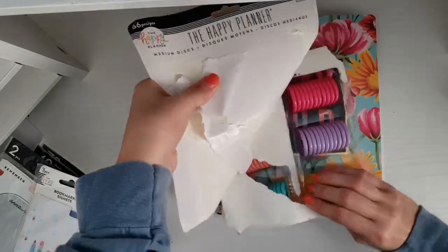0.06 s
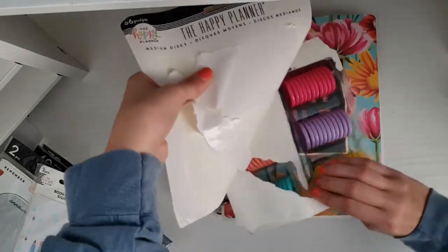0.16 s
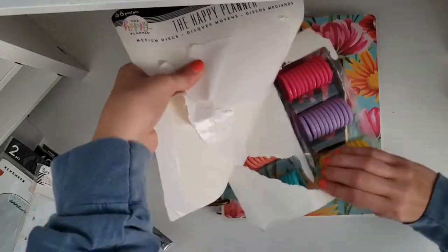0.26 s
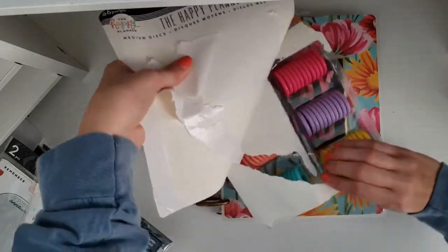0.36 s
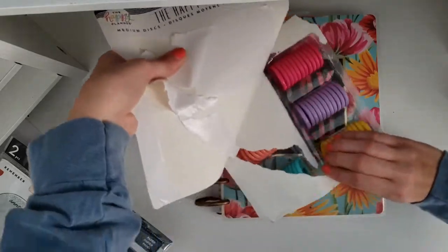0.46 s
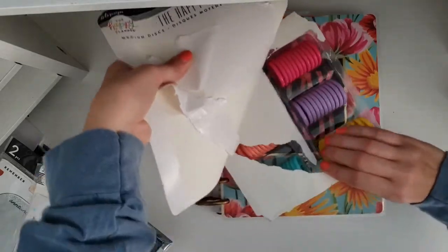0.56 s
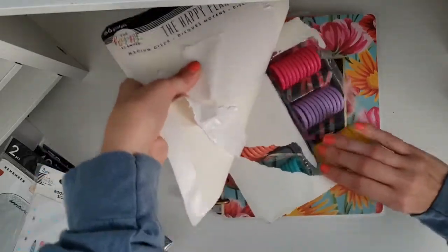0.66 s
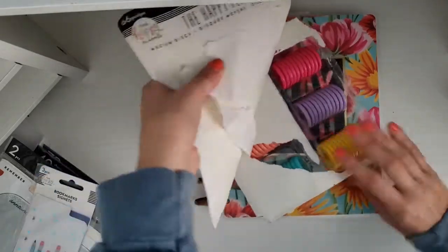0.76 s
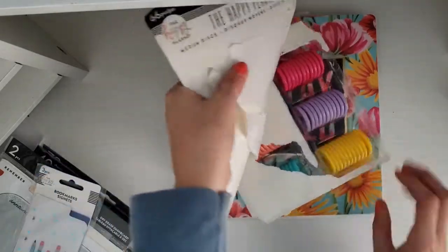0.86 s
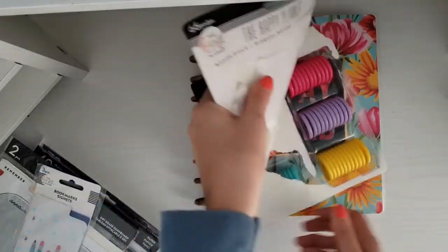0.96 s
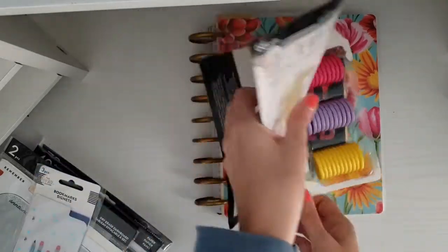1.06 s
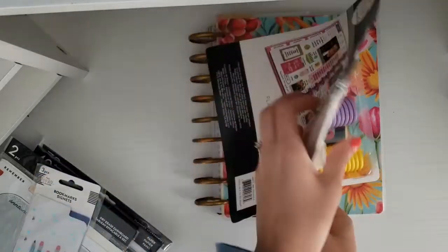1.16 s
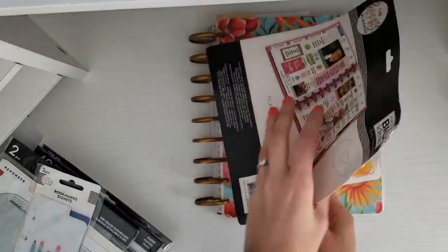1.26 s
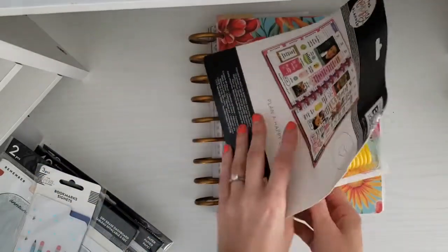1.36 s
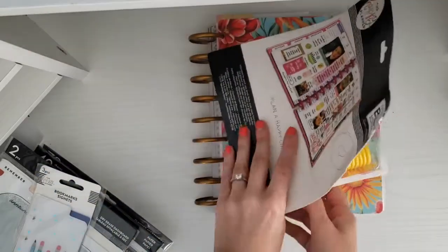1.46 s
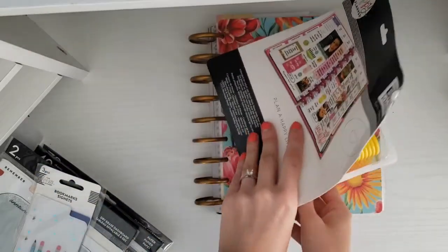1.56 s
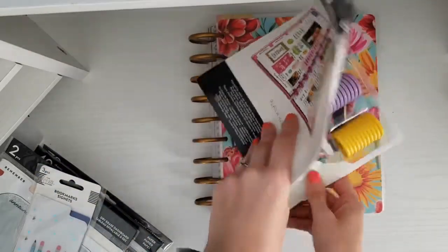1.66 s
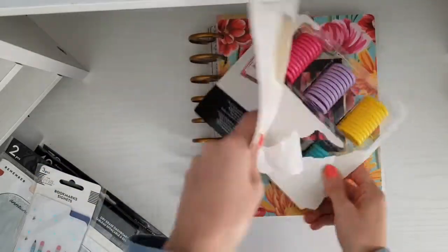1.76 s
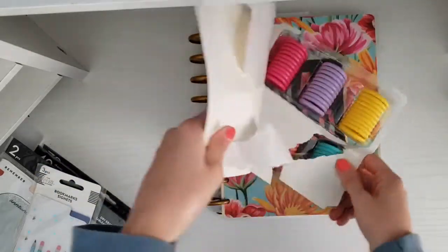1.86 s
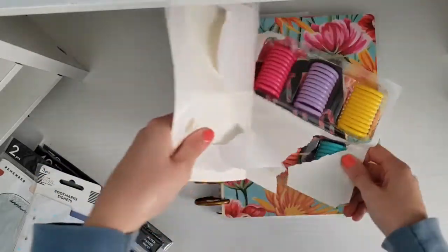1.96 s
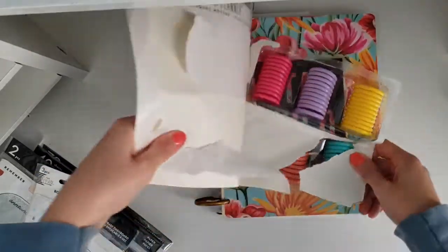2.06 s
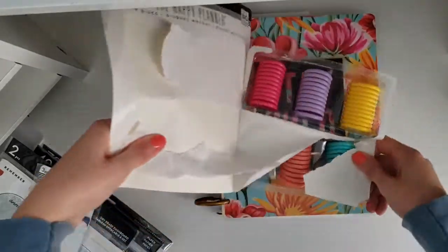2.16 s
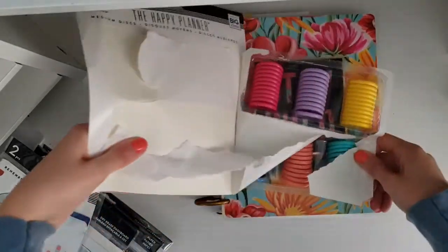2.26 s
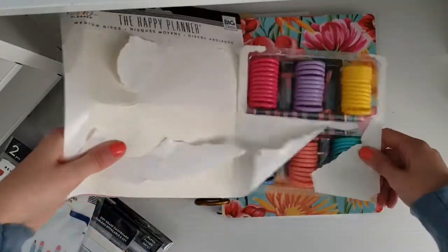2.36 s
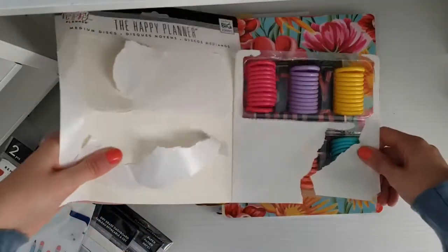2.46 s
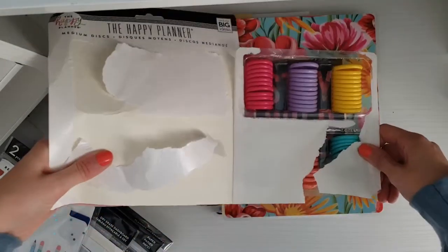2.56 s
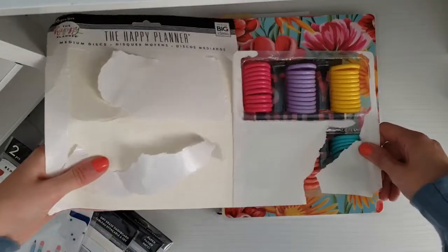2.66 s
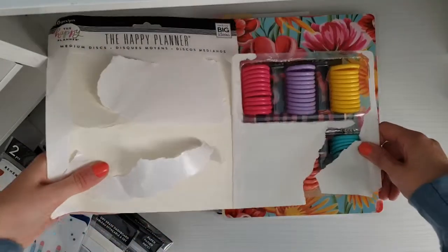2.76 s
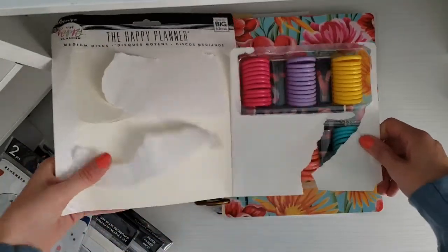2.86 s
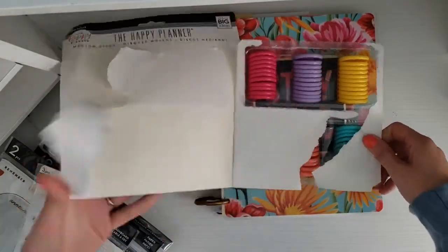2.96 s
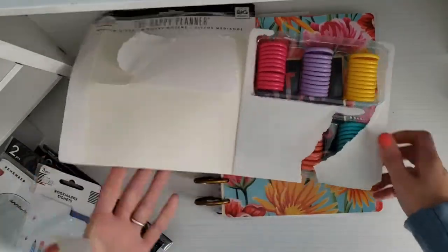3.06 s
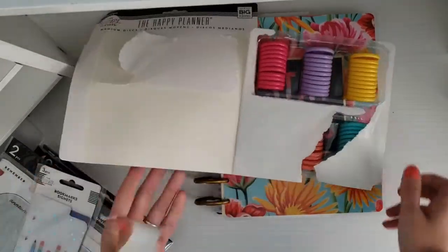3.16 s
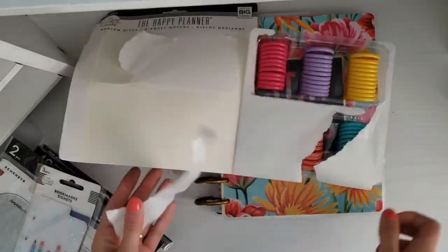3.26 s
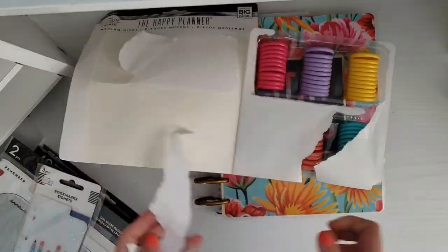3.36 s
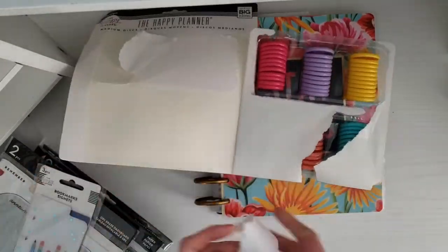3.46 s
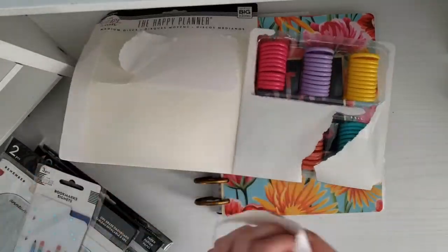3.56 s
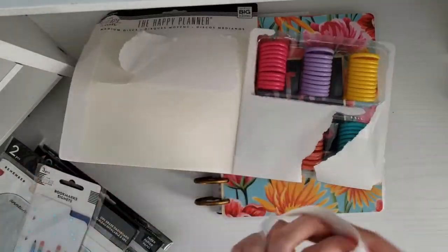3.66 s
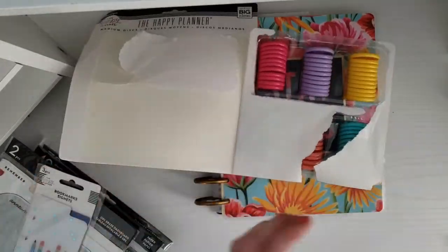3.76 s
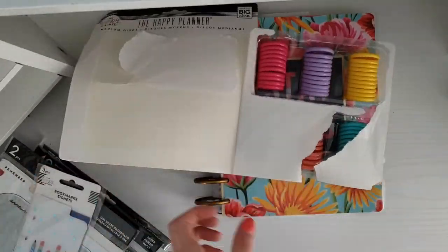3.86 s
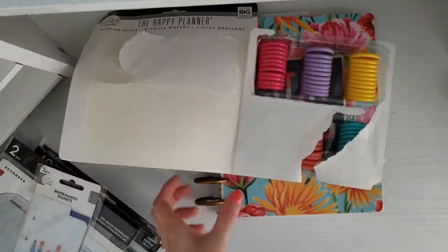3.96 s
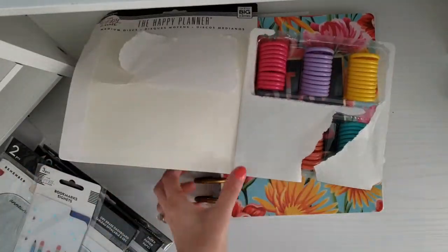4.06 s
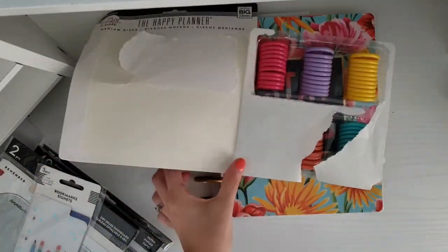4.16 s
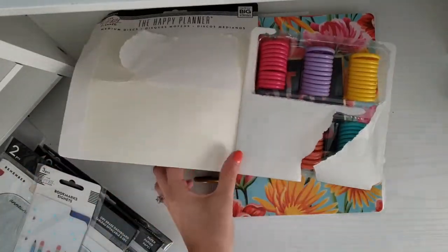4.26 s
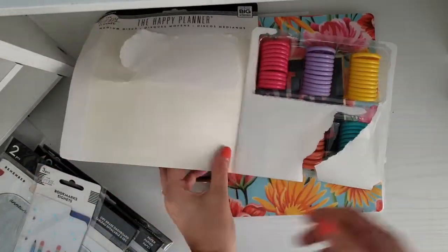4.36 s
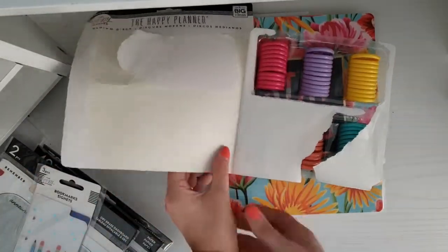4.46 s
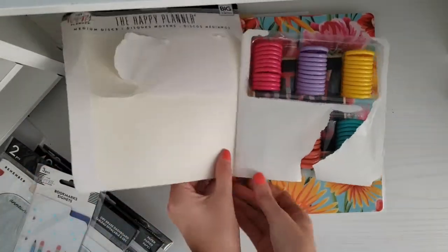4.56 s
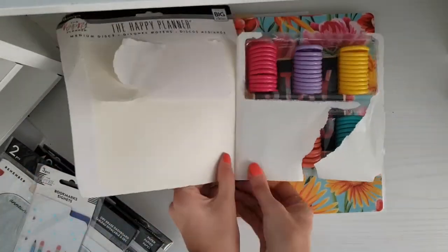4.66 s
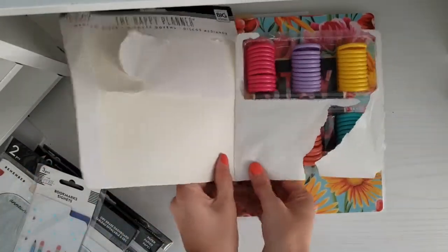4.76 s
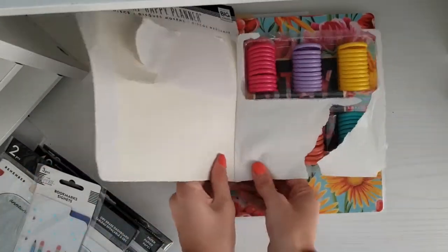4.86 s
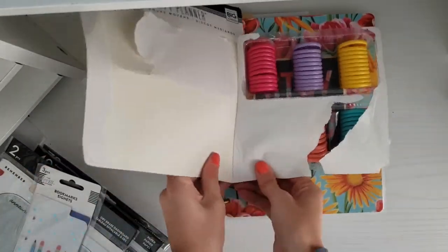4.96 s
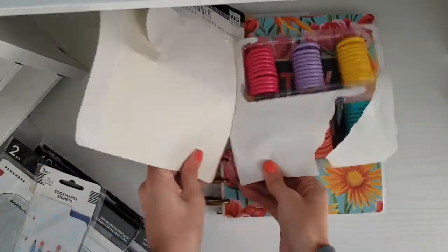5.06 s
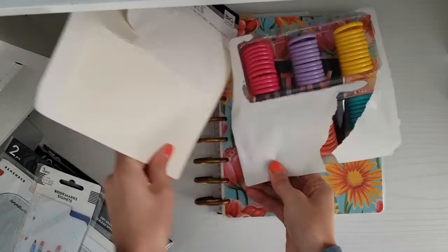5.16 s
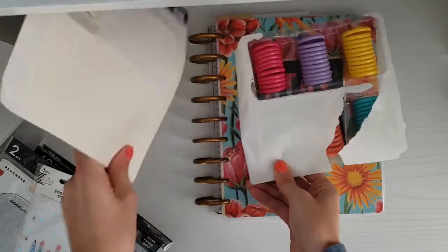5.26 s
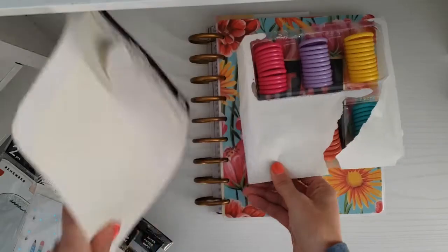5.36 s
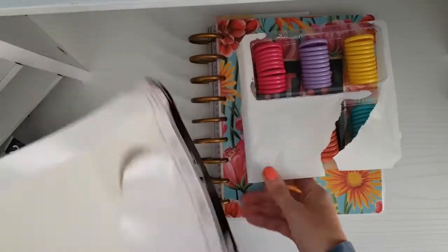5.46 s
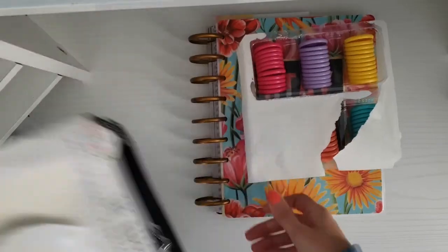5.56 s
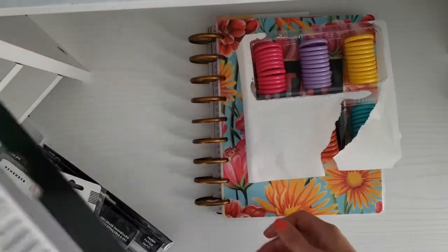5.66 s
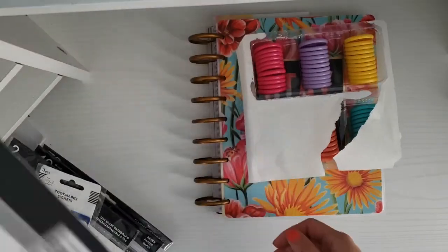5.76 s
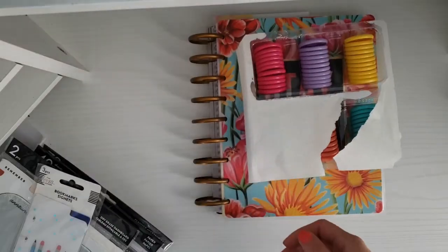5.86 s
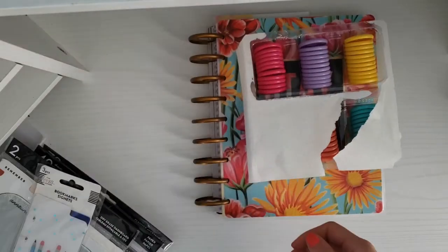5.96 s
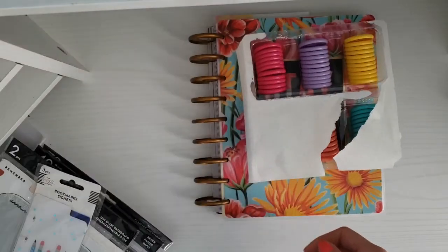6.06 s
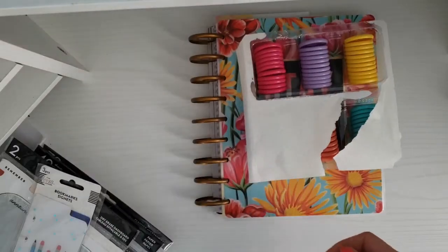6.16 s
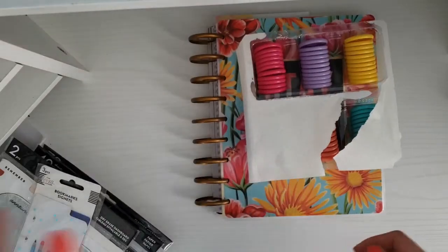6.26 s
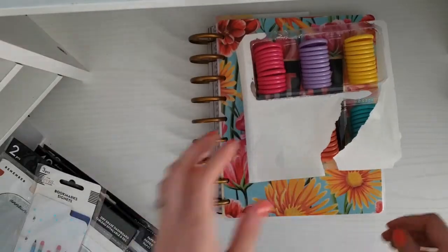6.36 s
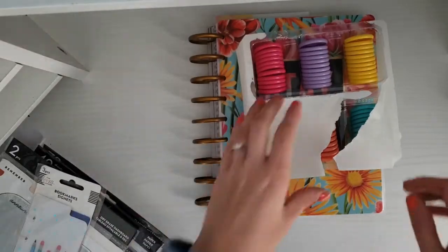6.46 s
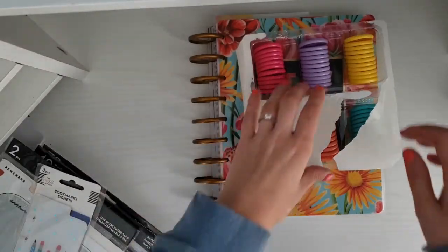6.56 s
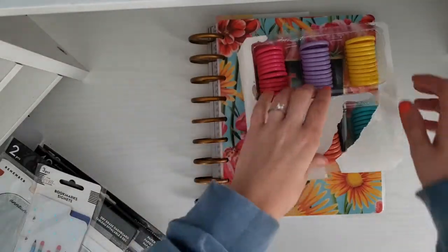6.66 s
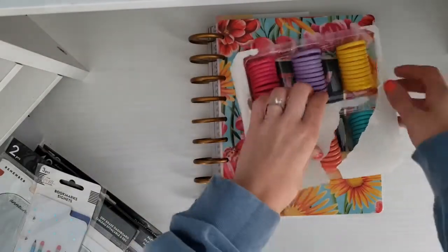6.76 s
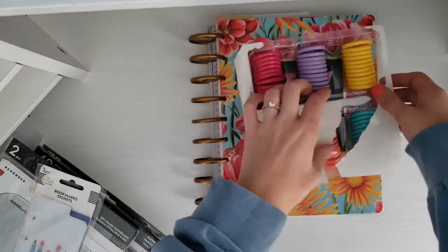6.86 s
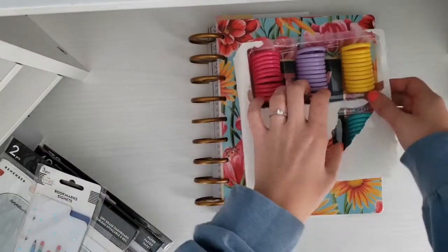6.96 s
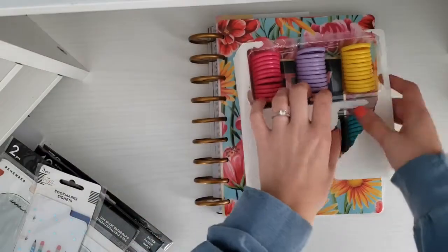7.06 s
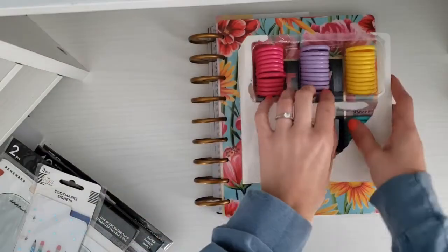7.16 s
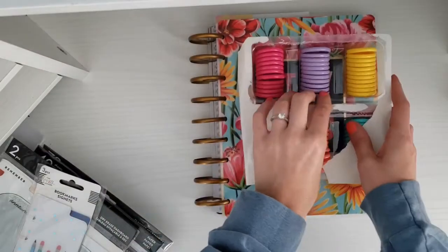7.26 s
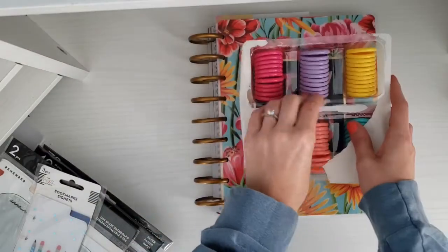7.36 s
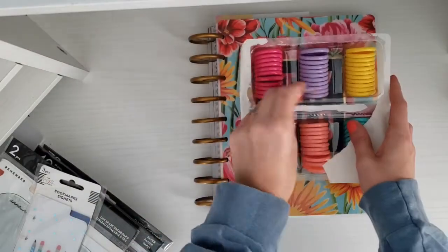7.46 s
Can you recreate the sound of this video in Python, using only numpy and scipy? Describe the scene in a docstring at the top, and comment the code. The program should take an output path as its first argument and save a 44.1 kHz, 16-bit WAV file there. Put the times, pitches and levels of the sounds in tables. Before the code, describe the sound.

Close to a stereo microphone in a small room, card rips and rustles while a thin plastic tray crackles as a package is pried open. The pulls come in irregular clumps, ease into a quiet stretch of light handling, then return with another rip. A single sharp snap and some last crinkling follow. The pack now and then knocks softly on the desk, over a faint low hum and hiss.

```python
"""Hands tear the card backing off a plastic blister pack on a desk, under a two-port microphone.
Fibres break in dense clumps, the card rustles and booms, and creases snap; the hollow plastic tray
colours all of these. The pack bumps the desk, which rings low. A small room answers,
and mains hum, a low rumble and a faint hiss lie underneath."""
import sys
import numpy as np
from scipy import signal
from scipy.fft import rfft, irfft, next_fast_len
from scipy.io import wavfile
from scipy.ndimage import uniform_filter1d, map_coordinates

SR = 44100
rng = np.random.default_rng(int(sys.argv[2]) if len(sys.argv) > 2 else 0)


def generate_wav(sig):
    """Save sig (samples, or channels by samples) to the path in sys.argv[1] as 16-bit PCM at SR."""
    pcm = np.round(np.clip(np.atleast_2d(sig).T, -1, 1) * 32767).astype(np.int16)
    wavfile.write(sys.argv[1], SR, pcm)


N = 332058

# Where the hands are: t/s, left over right/dB
HAND_POSITION = [(0.0, -0.5), (2.6, 0), (2.75, 1), (3.6, 0.5), (3.96, -6), (4.26, -1), (5.25, 1),
                 (5.8, 4.5), (6.37, 2.5), (6.5, -0.5), (7.53, 0)]
# How alike the microphone's left and right ports sound: f/Hz, likeness (1 = the same)
PORT_LIKENESS = [(60, 0.76), (300, 0.89), (700, 0.82), (1400, 0.46), (2800, .2), (6000, 0), (15000, 0.22)]


def tearing():
    """Fibres and thin film part in short bright grains; the card behind answers lower and longer."""
    # Tone colours of the card, the fibres and the film: f/Hz, level/dB
    card_colour = [(88, -42), (150, -7), (286, -14.5), (361, -5), (553, -6), (708, -6), (769, -4),
                   (1280, -4), (2340, -7.5), (2610, -13), (4000, -18.5), (5200, -41), (8800, -120)]
    fibre_colour = [(1180, -28), (2000, -4), (2340, -9.5), (2750, 0.5), (4600, -1.5), (6850, -4),
                    (7400, -18.5), (9620, -49), (16300, -120)]
    film_colour = [(4350, -28.5), (7400, -3), (7970, -6.5), (13500, 1.5), (15100, -3), (16000, -21.5)]
    # How strongly the card's low notes boom: t/s, boost/dB
    boom_boost = [(0, 1.5), (.45, -1.5), (.6, -4), (1.1, -4), (1.4, 0.5), (2.0, -3.5), (2.5, 0), (2.7, 7),
                  (2.9, -1), (3.2, 1), (4.2, 2), (4.7, 0.5), (5.2, -2.5), (6.0, -1.5), (6.8, -5.5),
                  (7.1, -1), (7.53, -2.5)]
    card_gain, fibre_gain, film_gain = strokes()
    rustle = grains(per_second=270, spread_db=4.0, t60=0.042, clump_db=1.5, bed=0.56)
    card = at_ports(patchy(rustle, depth_db=3), card_colour)
    boom = filtered(card, lambda hz: 1 / (1 + (hz / 850) ** 6))
    card = card + (amp(curve(boom_boost)) - 1) * boom
    breaks = grains(per_second=800, spread_db=3.5, t60=0.023, clump_db=3.5, bed=1.3)
    breaks = patchy(breaks, depth_db=1.4)
    bright = fibre_gain * at_ports(breaks, fibre_colour) + film_gain * at_ports(breaks, film_colour)
    return panned(curve(HAND_POSITION)) * (amp(-3.0) * card_gain * card + bright)


def strokes():
    """Each pull or rub swells and sinks; their powers add into gains for card, fibres and film."""
    # Pulls and rubs: peak t/s, card level/dB, fibres over card/dB, film over card/dB, rise/s, fall/s
    pulls = [(0.0, -29, -4.5, -9.5, .01, .6), (.1, -25.5, -16.5, -17, 0.054, .1),
             (.162, -34.5, 3.5, -4, .1, 0.25), (0.401, -34, -2, -4.5, .4, 0.065),
             (.518, -25, -12, -17.5, 0.029, 0.13), (0.661, -27, -12.5, -13, 0.017, .12),
             (0.724, -41, -4, -11, 0.036, 0.054), (0.855, -37, -22, -23, .002, 0.076),
             (0.974, -27.5, -22.5, -22.5, 0.0024, 0.1), (1.053, -26, -9.5, -15, 0.11, .06),
             (1.124, -30.5, -8.5, -14.5, .06, 0.041), (1.34, -54, -1, -3, 0.14, 0.36),
             (1.634, -49, -11.5, -15.5, 1.7, 0.45), (1.693, -29, 0.5, -6, 0.0029, .1),
             (1.761, -24.5, -7.5, -8, 0.013, .45), (1.999, -22, 3, -4.5, 0.0025, 0.035),
             (2.019, -30, -4.5, -9.5, 0.024, 0.24), (2.2, -35, -4, -4, 0.25, 0.3),
             (2.262, -31.5, -6, -9.5, 0.011, 0.11), (2.348, -20.5, -6.5, -5, 0.14, .18),
             (2.464, -18.5, -15, -11.5, 0.045, 0.032), (2.876, -41.5, -8, -14, 0.27, 0.304),
             (3.057, -39.5, -21.5, -30.5, .002, 0.13), (3.276, -50, -7, -10, 0.0029, .1),
             (3.35, -76, 7.5, 8.5, 0.28, 0.6), (3.5, -57, 5, 3.5, 0.014, 0.091),
             (3.552, -52, 6, 2, .002, 0.055), (3.648, -68, 12.5, 17.5, .12, .16),
             (3.88, -96.5, 15, 33, .08, 0.62), (4.0, -74.5, -3, 6.5, .1, 0.36),
             (4.354, -69, -21, -17, 0.15, 0.19), (4.473, -60.5, -1, -6.5, 0.095, 0.41),
             (4.6, -54.5, -16, -18, 0.061, 0.35), (4.71, -48, 2, 2.5, 0.0027, 0.11),
             (4.823, -34.5, -5.5, -6.5, 0.0017, 0.15), (5.029, -37.5, -1.5, -8, .17, .4),
             (5.195, -25.5, -12, -11.5, 0.33, 0.069), (5.31, -25, -9, -26.5, 0.00393, .04),
             (5.35, -29, -9, -19.5, 0.0049, .12), (5.566, -65, -16.5, -20, .05, 0.33),
             (5.68, -68.5, -8, -9, 0.0093, 0.22), (5.914, -28, -14, -21, 0.0013, 0.16),
             (6.014, -48.5, -24, -18, .05, 0.34), (6.203, -52, -0.5, -6.5, 0.345, 0.043),
             (6.6, -61, -18, -14.5, 0.067, 0.78), (6.716, -43.5, -6.5, -8, 0.134, 0.29),
             (6.809, -48.5, -9, -11, 0.082, 0.18), (7.061, -49, -7.5, -13, 0.36, 0.046),
             (7.07, -31, 0, -6.5, 0.007, 0.064), (7.142, -26, -12, -12, 0.039, .085),
             (7.27, -56.5, -1, 8, 0.25, 0.47), (7.306, -26.5, -12, -12.5, 0.015, 0.59),
             (7.53, -29.5, -7, -15, 0.41, .1)]
    peak, db, fibre_db, film_db, rise, fall = np.transpose(pulls)[:, :, None]
    swell_db = 30  # climbed during the rise, lost during the fall
    t = np.arange(0, N, 32) / SR
    ramp = np.where(t < peak, (peak - t) / rise, (t - peak) / fall)
    card_db = db - swell_db * ramp
    gains = [np.linalg.norm(amp(card_db + over_db), axis=0) for over_db in (0, fibre_db, film_db)]
    return [np.interp(np.arange(N) / SR, t, gain) for gain in gains]


def grains(per_second, spread_db, t60, clump_db, bed):
    """Random breaks of unequal size let noise through over a steady bed; each fades 60 dB in t60 s."""
    chance, size = rng.random(N), rng.exponential(1, N)
    breaks = (chance < per_second / SR) * amp(spread_db * np.minimum(size, 4) + clump_db * wobble(40))
    t = np.arange(SR // 20) / SR
    gate = unit(signal.fftconvolve(breaks, amp(-60 * t / t60))[:N])
    return (gate + bed) * rng.standard_normal((2, N))


def patchy(pair, depth_db):
    """As the sheet bends its resonances shift: random gain in patches of time and frequency."""
    spectra = signal.stft(pair, nperseg=256)[2]
    patches = uniform_filter1d(rng.standard_normal(spectra.shape[1:]), size=3, axis=0)
    patches = uniform_filter1d(patches, size=10, axis=1)
    return signal.istft(spectra * amp(depth_db * unit(patches)), nperseg=256)[1][:, :N]


def creases():
    """A crease flips: the flat patch beside it thuds round its pitch, with a crack and sizzle on top."""
    # Crease snaps: t/s, level/dB, thud f/Hz, crack offset/dB, sizzle offset/dB, time to fade 60 dB/s
    snaps = [(0.094, -7, 1050, -11, -26, 0.039), (0.375, -32.5, 1350, -7, -10.5, 0.04),
             (0.467, -26, 1170, -14, -35, 0.054), (0.505, -27.5, 466, -22, -24, 0.029),
             (0.584, -33, 596, -14, -28, 0.032), (0.63, -25.5, 516, -27, -28, 0.026),
             (0.649, -17, 1260, -32, -18, 0.035), (0.712, -27.5, 494, 5.5, -12.5, 0.025),
             (0.85, -36, 1110, -31, -32, 0.047), (0.864, -34, 595, -25, -32, 0.047),
             (0.939, -42, 1250, -10, -10, 0.035), (0.974, -18, 1170, -8, -26.5, 0.035),
             (0.992, -18, 1220, -21, -31, 0.035), (1.042, -13.5, 1090, -20.5, -29, 0.038),
             (1.119, -31.5, 493, -5, -23, 0.035), (1.242, -42, 405, -19, -13, 0.035),
             (1.361, -34, 1090, -10, -18, 0.059), (1.421, -40.5, 410, -19, -28, 0.05),
             (1.469, -32, 406, -27, -30, 0.026), (1.546, -35, 436, -20, -29, 0.059),
             (1.616, -39, 400, -32, -37, 0.04), (1.693, -16, 1350, -6, -18, 0.035),
             (1.757, -11, 1000, -26, -20, 0.027), (1.794, -20.5, 1050, -9, -16.5, 0.035),
             (1.833, -10.5, 1170, -23, -20.5, 0.035), (1.928, -28.5, 577, -12, -18, 0.035),
             (1.999, -5, 1350, -2.5, -26.5, 0.02), (2.112, -29, 1710, -3, -15, 0.035),
             (2.153, -28.5, 1680, 2, -10.5, 0.049), (2.171, -29, 1600, 2, -1, 0.039),
             (2.188, -18, 1360, 3.5, -8, 0.039), (2.259, -12, 1410, -22, -22, 0.035),
             (2.3, -19.5, 1130, -13, -12, 0.043), (2.329, -7.5, 746, -4, -18, 0.058),
             (2.34, -5.5, 910, -2.5, -18.5, 0.02), (2.35, -11.5, 1900, -15, -12, 0.035),
             (2.368, -8.5, 1300, -23, -20.5, 0.045), (2.461, -16, 557, -19, -19.5, 0.035),
             (2.692, -36, 590, -14, -33, 0.11), (2.814, -34, 980, -1, -26, 0.076),
             (2.957, -38.5, 1120, -6, -5, 0.022), (3.057, -19.5, 870, -5, -41, 0.052),
             (3.274, -38, 843, -10, -12, 0.038), (3.434, -46.5, 2700, 0, -1, 0.0353),
             (3.495, -54, 2900, 2, -6, 0.035), (3.553, -42, 489, 14.5, 9, 0.028),
             (3.658, -45, 491, -7, -1.5, 0.036), (4.343, -46.5, 1209, -17.5, -28, 0.0361),
             (4.475, -37.5, 597, 4, -12, 0.018), (4.576, -33, 568, -25, -32, 0.06),
             (4.633, -42.5, 1210, -17, -28, 0.031), (4.69, -39, 513, -1, -10, 0.023),
             (4.711, -28.5, 1220, 1, -11, 0.025), (4.823, -22.5, 1170, 4, -9, 0.017),
             (4.982, -33.5, 1010, -14, -12, 0.0333), (5.114, -18.5, 970, 0, -18, 0.029),
             (5.132, -15.5, 1240, -24, -24, 0.039), (5.166, -23, 1890, -8, -14.5, 0.035),
             (5.195, -12.5, 924, -12, -17.5, 0.053), (5.31, -26, 1790, -18, -32, 0.035),
             (5.352, -18, 1560, -6, -27, 0.024), (5.398, -27.5, 2060, -1, -24, 0.0354),
             (5.569, -51, 464, -27, -36, 0.035), (5.912, -18.5, 1600, -1, -33, 0.017),
             (5.982, -33, 541, -25, -17, 0.035), (6.084, -37.5, 770, 0, -24.5, 0.027),
             (6.178, -32.5, 2340, 1, -3, 0.013), (6.205, -38, 2220, 2, -4, 0.035),
             (6.717, -27.5, 1330, -4, -7.5, 0.049), (6.803, -30, 1170, -27, -14, 0.071),
             (6.952, -47, 1310, -7, -17, 0.046), (6.969, -37.5, 1210, -1, -7, 0.035),
             (7.025, -33, 1120, -11, -23, 0.066), (7.071, -32.5, 1140, -9, -13.5, 0.032),
             (7.134, -25, 1050, -14, -14.5, 0.022), (7.242, -40, 1750, -8, 8, 0.035),
             (7.304, -14, 1520, -23, -14.5, 0.078), (7.486, -27.5, 1610, -20, -23, 0.038),
             (7.506, -21, 1190, -8, -18.5, 0.042)]
    spread, scatter_db = 1.9, 3.5  # creases lie wider than the hands, each a little elsewhere
    out, t = np.zeros((2, N + SR)), np.arange(SR // 6) / SR

    def fade(seconds):
        return (1 - np.exp(-t / .0003)) * amp(-60 * t / seconds)

    for start, db, hz, crack_db, sizzle_db, t60 in snaps:
        hand_db = np.interp(start, *np.transpose(HAND_POSITION))
        pan_db = spread * hand_db + scatter_db * rng.standard_normal()
        shared, per_port = rng.standard_normal(len(t)), rng.standard_normal((2, len(t)))
        push = (shared + 0.43 * per_port) * (fade(t60) + 0.96 * fade(0.0054))
        thud = band(push, hz / 1.125, hz * 1.138, order=1) + 0.23 * band(push, 250, 2800, order=1)
        sharp = per_port * (1.7 * fade(.005) + fade(0.4 * t60) + .25 * fade(2.0 * t60))
        crack, sizzle = band(sharp, 2500, 6200, order=3), band(sharp, 7900, 10000, order=2)
        snap = amp(-4.0) * thud + amp(crack_db) * crack + amp(sizzle_db) * sizzle
        out[:, round(start * SR):][:, :len(t)] += amp(db) * panned(pan_db)[:, None] * snap
    return out[:, :N]


def tray(hz):
    """The hollow plastic tray lifts or dips certain pitches in whatever shakes it."""
    # Tray resonances: f/Hz, width/Hz, boost/dB
    resonances = [(357, 27, 6), (462.3, 67, 4), (600, 24, 7.5), (657, 15, -8.5), (790, 45, -2.5),
                  (1111, 260, 2), (1283, 60, 2.5), (1647, 21, 4.5), (1930, 70, 0.5), (2650, 80, 4),
                  (3260, 130, 3)]
    return 1 + sum((amp(db) - 1) * 1j * hz * width / (centre ** 2 - hz ** 2 + 1j * hz * width)
                   for centre, width, db in resonances)


def desk_bumps():
    """Soft pushes on the desk top ring those of its own notes that lie near the push's pitch."""
    # Pushes on the desk: t/s, level/dB, f/Hz
    pushes = [(0.09, -41, 260), (0.651, -52.5, 137), (0.848, -55, 137), (0.984, -56, 224),
              (1.126, -53, 124.4), (1.613, -63, 121), (1.752, -37, 256), (1.99, -39, 266),
              (2.181, -51, 254), (2.317, -39.5, 71.4), (2.834, -62, 158), (2.909, -65, 115),
              (3.05, -51, 265), (4.504, -52.5, 68), (5.032, -50, 129), (5.099, -44.5, 263),
              (5.33, -48.5, 133.3), (5.911, -50, 71.5), (6.815, -50, 122.3), (7.123, -48, 130),
              (7.327, -55, 237)]
    # The desk's own notes: f/Hz, level/dB
    desk_notes = [(69, -0.5), (128, 2.5), (255, -1.5)]
    reach, t60 = 0.23, 0.27  # what counts as near (log of the pitch ratio); seconds to fade 60 dB
    out, t = np.zeros(N + SR), np.arange(SR // 5) / SR
    attack = 1 - np.exp(-t / 0.0015)
    for start, db, push_hz in pushes:
        ring = sum(amp(note_db) * np.exp(-(np.log(push_hz / hz) / reach) ** 2) * np.sin(2 * np.pi * hz * t)
                   for hz, note_db in desk_notes)
        out[round(start * SR):][:len(t)] += amp(db + 3.0 - 60 * t / t60) * attack * ring
    return out[:N]


def room(pair):
    """The walls answer with a short echo whose treble dies a little sooner than its bass."""
    # Echo length: f/Hz, time to fade 60 dB/s
    echo_times = [(200, 0.22), (1500, 0.2), (10000, 0.18)]
    hz, t, noise = signal.stft(rng.standard_normal((2, SR // 2)), SR, nperseg=256)
    hz = hz[:, None]
    mid, side = noise * amp(-60 * t / along(echo_times, hz)) * mid_and_side(hz)
    echo = signal.istft(np.array([mid + side, mid - side]), SR, nperseg=256)[1]
    delayed = np.pad(pair, ((0, 0), (150, 0)))
    return signal.fftconvolve(delayed, echo / np.linalg.norm(echo[0]), axes=1)[:, :N]


def background():
    """Mains hum wavers inside a low rumble, under a faint steady hiss."""
    # Tones of the mains hum: f/Hz, relative level/dB
    mains_tones = [(59.2, -71), (118.4, -67.5)]
    # Rise and fall of hum and rumble together: t/s, level/dB
    low_level = [(0.0, -52), (0.23, -61), (0.8, -62.5), (1.07, -58), (1.21, -64), (1.9, -59), (2.08, -57),
                 (2.35, -76.5), (2.7, -59.5), (3.1, -60.5), (3.33, -69.5), (3.69, -71.5), (4.5, -64),
                 (4.67, -60.5), (5.1, -62.5), (5.4, -51), (5.66, -61), (7.07, -61.5), (7.53, -54.5)]
    # Tone colours of the rumble and the hiss: f/Hz, level/dB
    rumble_colour = [(24, -31.5), (40, -12), (123, -5.5), (183, -19.5), (311, -16.5), (400, -49),
                     (520, -75), (880, -120)]
    hiss_colour = [(240, -30), (400, 0), (777, -12.5), (906, -6), (2250, -25.5), (4950, -6), (8370, -24),
                   (16000, -14)]
    t, waver_db = np.arange(N) / SR, 2.5
    hum = sum(amp(db + waver_db * wobble(15)) * np.sin(2 * np.pi * (hz * t + 0.17 * wobble(9.1)))
              for hz, db in mains_tones)
    rumble = at_ports(rng.standard_normal((2, N)), rumble_colour)
    hiss = at_ports(rng.standard_normal((2, N)), hiss_colour)
    return amp(curve(low_level) - 2.5) * (unit(hum) + amp(-3.0) * rumble) + amp(-76) * hiss


def at_ports(pair, colour):
    """Colour and mix two unrelated signals so that the ports agree mainly in the bass."""
    mid, side = filtered(pair, lambda hz: amp(along(colour, hz)) * mid_and_side(hz))
    return unit(np.array([mid + side, mid - side]))


def mid_and_side(hz):
    """Gains for what the two ports share (mid) and what sets them apart (side)."""
    angle = np.arccos(along(PORT_LIKENESS, hz)) / 2
    return np.array([np.cos(angle), np.sin(angle)])


def panned(db):
    """Left and right gains, with the left louder by db."""
    return amp(np.array([db / 2, -db / 2]))


def amp(db):
    """Turn decibels into a gain."""
    return 10 ** (np.asarray(db) / 20)


def unit(x):
    """Scale x to an average power of 1."""
    return x / np.sqrt(np.mean(x ** 2) + 1e-20)


def along(points, hz):
    """Read between (f/Hz, value) points on a log frequency axis."""
    freqs, values = np.transpose(points)
    return np.interp(np.log(hz + 1), np.log(freqs + 1), values)


def curve(points):
    """Join (t/s, value) points into one value per sample."""
    return np.interp(np.arange(N) / SR, *np.transpose(points))


def wobble(rate):
    """A smooth curve through `rate` random values a second (at most 200)."""
    return map_coordinates(rng.standard_normal(int(N * 200 / SR) + 4), [np.arange(N) * rate / SR])


def filtered(x, response):
    """Multiply each frequency in x by response(hz)."""
    size = next_fast_len(N + SR // 2)
    return irfft(rfft(x, size) * response(np.fft.rfftfreq(size, 1 / SR)), size)[..., :N]


def band(x, lo_hz, hi_hz, order):
    """Keep one frequency band of x, scaled to a peak of 1."""
    y = signal.sosfilt(signal.butter(order, [lo_hz, hi_hz], "band", fs=SR, output="sos"), x)
    return y / np.abs(y).max()


def scene():
    """Snaps and tearing sound through the tray and into the room, over desk bumps and background."""
    snaps, tear = filtered(creases(), tray), filtered(tearing(), tray)
    echo = room(amp(-7.5) * snaps + amp(-9.0) * tear)
    return snaps + tear + echo + desk_bumps() + background()


def record(dry):
    """The microphone's right port favours the high treble; nothing above top_hz is kept."""
    # Balance of the ports: f/Hz, right over left/dB
    right_boost = [(2000, 0.5), (5000, -1), (9000, 3.5)]
    top_hz = 15900
    return filtered(dry, lambda hz: (hz < top_hz) * panned(-along(right_boost, hz)))


dry = scene()
out = record(dry)
generate_wav(out)
```